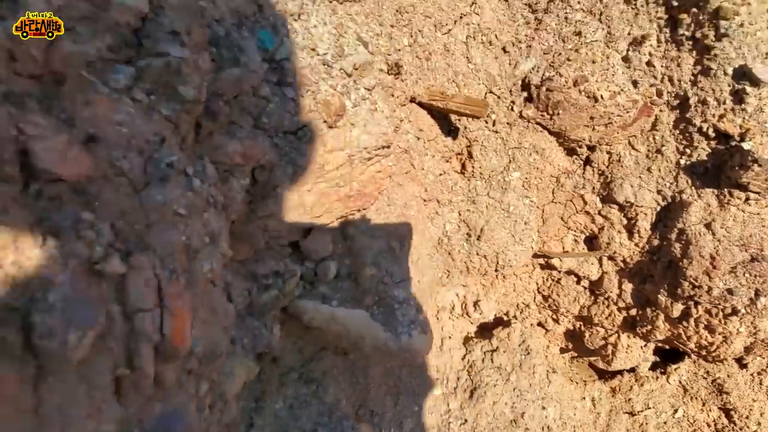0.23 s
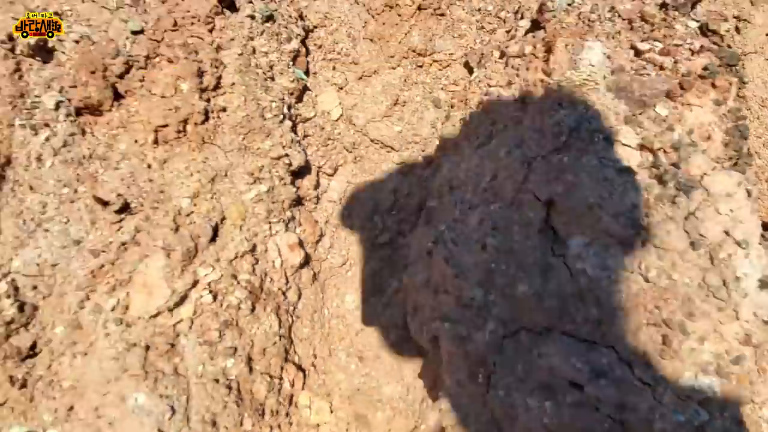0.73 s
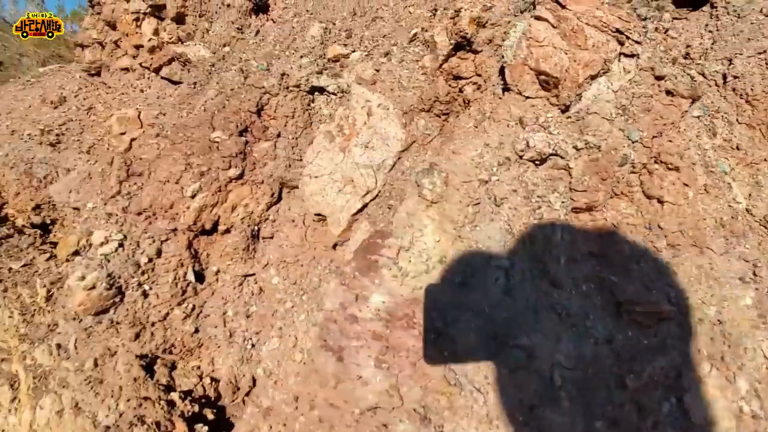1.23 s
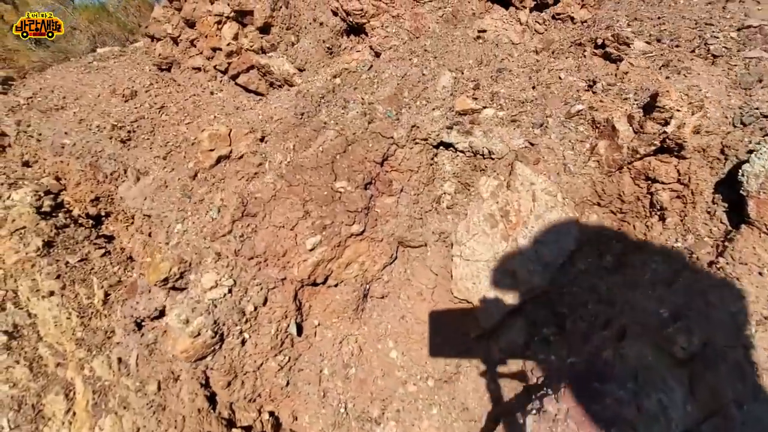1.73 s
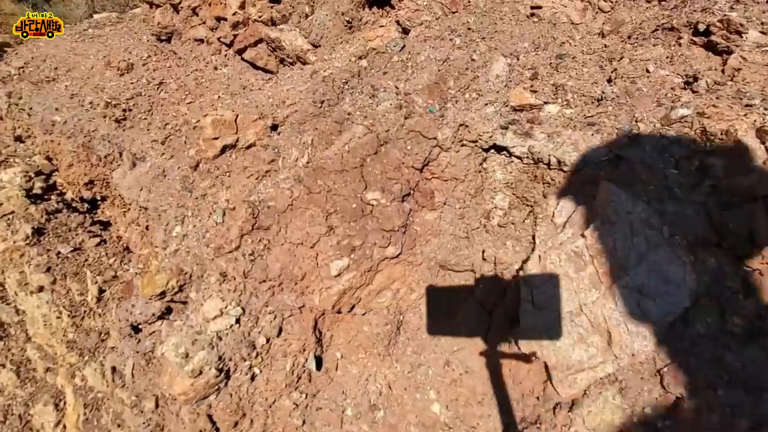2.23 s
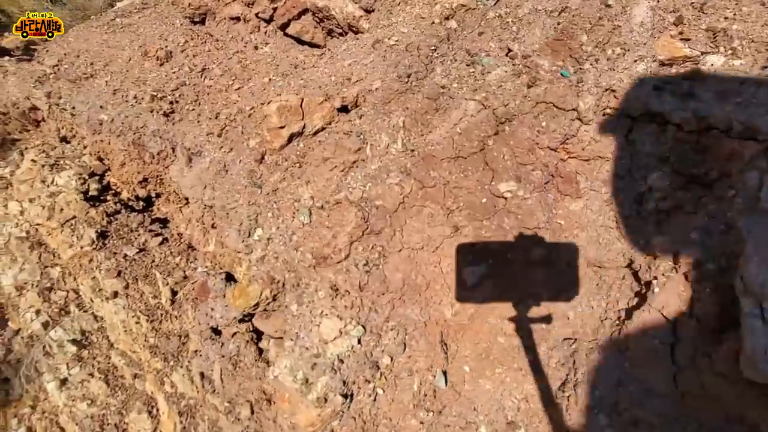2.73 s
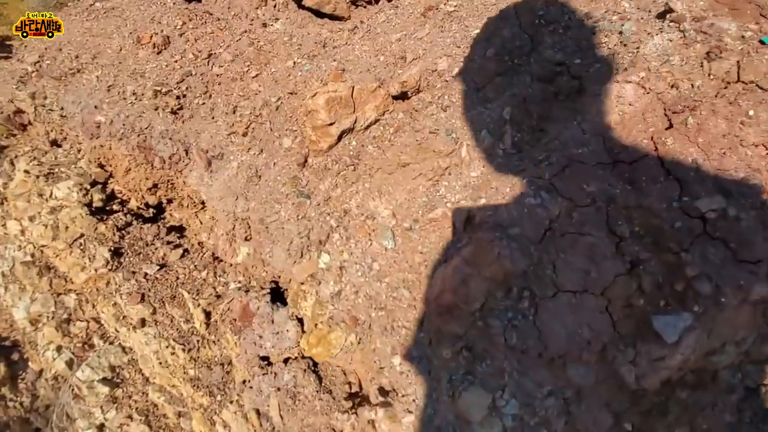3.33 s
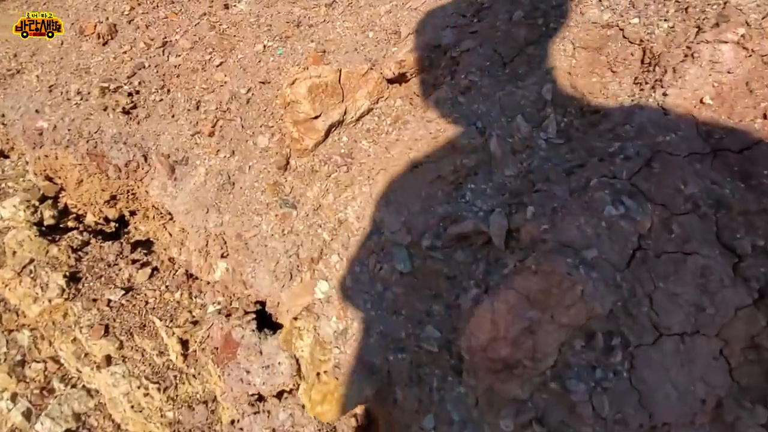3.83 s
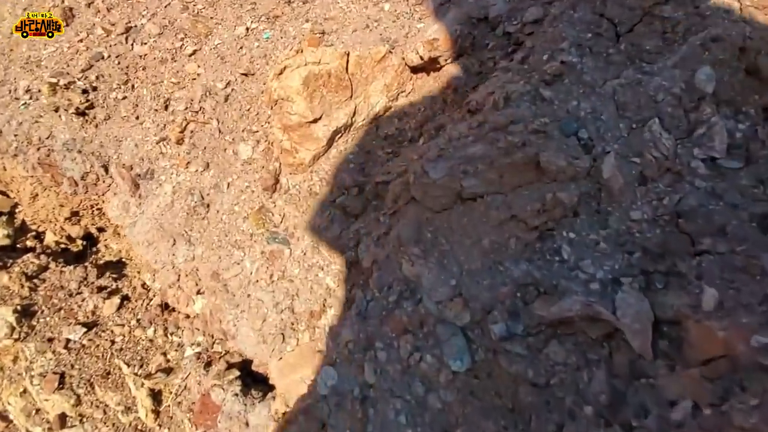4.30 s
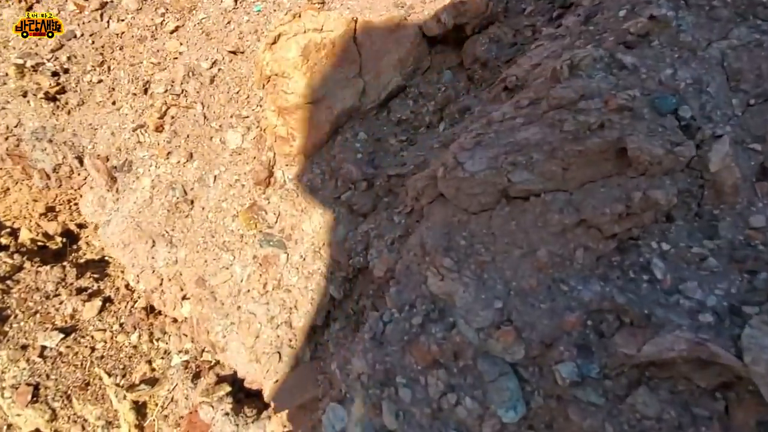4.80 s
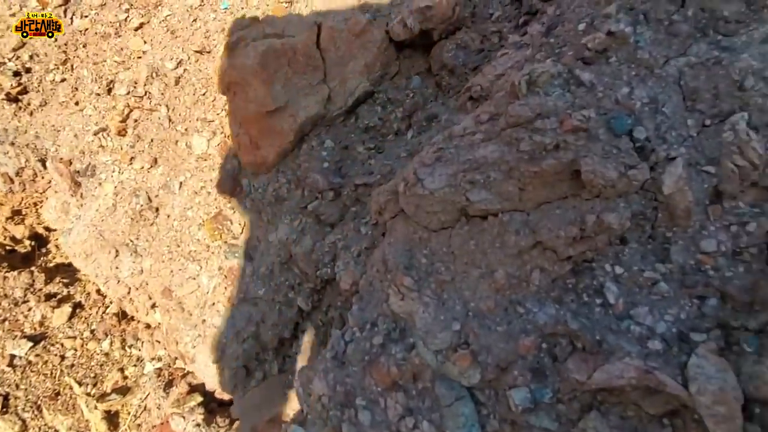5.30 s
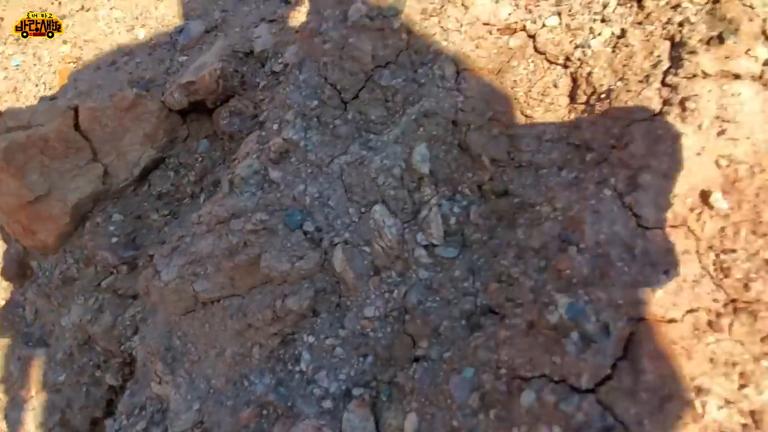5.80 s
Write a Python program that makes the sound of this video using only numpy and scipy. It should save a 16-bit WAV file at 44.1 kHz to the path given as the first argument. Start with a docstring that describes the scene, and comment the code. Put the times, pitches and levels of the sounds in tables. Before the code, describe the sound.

Slow, uneven footsteps cross dry, stony ground outdoors, heard close up while wind buffets the microphone. It opens quietly with a faint hiss and low rumble. At about 0.7 seconds a stone cracks and the wind picks up. From 1 to 2 seconds grit crackles brightly, sand hisses and a sole scuffs, with pebbles knocking underfoot. More crunches and clinks follow between 2.5 and 3 seconds. The wind rumbles, flutters and slaps unevenly on the left and right, strongest around 3.4 to 3.7 seconds. It drops away near 3.9 seconds, when a heel lands with a dull thud, followed by a scrape and a run of stony clacks, sharpest around 4.4 seconds. Gusts return from 4.5 seconds, with a soft scuffing step near 5 seconds, thumps of wind around 5.4 and another crunch at 5.7 seconds.

```python
"""Slow steps crunch and scuff over dry stony ground while wind buffets a phone held on a pole.
Under each sole pebbles knock, grit crackles and sand hisses; single stones crack and clink.
Rubber drags over packed earth, and one heel lands hard. The steps reach both microphone ports.
Wind rumbles, flutters and slaps at each port separately, over a faint hiss."""
import sys
import numpy as np
from scipy import signal
from scipy.fft import rfft, irfft, next_fast_len
from scipy.io import wavfile
from scipy.ndimage import uniform_filter1d, minimum_filter1d

SR = 44100
rng = np.random.default_rng(int(sys.argv[2]) if len(sys.argv) > 2 else 0)


def dump(signal):
    """Clip the signal to [-1, 1] and save it as 16-bit WAV at the path in sys.argv[1]."""
    limited = np.clip(np.atleast_2d(signal).T, -1, 1)
    pcm = np.round(limited * 32767).astype(np.int16)
    wavfile.write(sys.argv[1], SR, pcm)


N = 266849

# spectrum of sand and of crack ticks: (frequency [Hz], relative level [dB])
SAND_SPECTRUM = [(5500, -36), (8000, 7.5), (10000, 1), (13000, 1.5), (16000, -3), (20000, 9)]


def ground_crunch():
    """Pebbles knock, grit crackles, sand hisses; returns a common part and a scattered part per port."""
    # impact spectra: (frequency [Hz], relative level [dB])
    pebble_spectrum = [(250, -21), (480, -4.5), (700, -1.5), (950, -3.5), (1300, -8), (1800, -7),
                       (2600, -11), (4000, -24.5)]
    grit_spectrum = [(1200, -17), (2200, -1), (3200, 4), (3900, 5), (5000, -5.5), (6000, 0), (7500, -12),
                     (9500, -61.5)]
    # loose pebbles, then grit: (lowest [Hz], highest [Hz], taps per stone [1/s], t60 [s], share [dB])
    loose_stones = [(633, 2000, 70, 0.048, -1.5), (2480, 6100, 140, 0.0063, -2.5)]
    coarse = grains(rate_per_s=700, spread_db=3.3, decay_s=0.0025)
    fine = grains(rate_per_s=1100, spread_db=2.7, decay_s=0.0018)
    gains = tread_gains()
    layers = list(zip(gains, (coarse, fine, fine), (pebble_spectrum, grit_spectrum, SAND_SPECTRUM)))

    def crunch():
        return sum(gain * unit_rms(colour(impacts * rng.standard_normal(N), spectrum))
                   for gain, impacts, spectrum in layers)

    common, scattered = crunch(), [crunch(), crunch()]
    for side in scattered:
        side += sum(gain * ringing_stones(*row) for gain, row in zip(gains, loose_stones))
    return common, scattered


def tread_gains():
    """Gains of pebbles, grit and sand as each tread lands, holds and lifts off."""
    # (full weight at [s], landing [s], hold [s], pebbles [dB], grit [dB], sand [dB])
    treads = [(0, .05, 0.0076, -63.5, -87, -94), (.38, 0.3, 0.14, -76, -78, -73),
              (0.7, 0.033, 0.0078, -56, -61, -58), (.87, 0.27, 0.076, -61, -65.5, -54),
              (1.029, 0.079, 0.089, -53.5, -56.5, -53), (1.14, 0.17, 0.1, -51.5, -71, -59),
              (1.26, 0.12, 0.015, -72, -59.5, -50.5), (1.36, 0.12, 0.13, -58, -59.5, -57),
              (1.58, 0.37, 0.037, -54, -66.5, -66), (1.755, 0.13, 0.0055, -45, -49.5, -51),
              (1.989, 0.08, 0.036, -49.5, -57, -59), (2.198, 0.26, 0.12, -60.5, -72, -65),
              (2.528, 0.33, 0.0072, -55, -59.5, -63), (2.69, 0.059, 0.31, -63, -65.5, -67),
              (2.919, 0.06, 0.17, -51.5, -58, -61), (3.3, 0.69, 0.18, -65.5, -71.5, -85),
              (3.669, 0.1, 0.012, -52.5, -64.5, -78.5), (3.927, 0.035, 0.0073, -52, -62.5, -61),
              (3.995, .02, 0.018, -76, -66.5, -60), (4.064, .02, 0.0091, -56.5, -71, -55),
              (4.109, 0.056, 0.016, -51, -60, -75), (4.219, 0.11, 0.0077, -53.5, -60, -58),
              (4.36, 0.25, 0.11, -56.5, -68, -66.5), (4.55, 0.098, 0.094, -70, -75, -77),
              (4.9, 0.26, 0.069, -66, -64.5, -65), (5.03, 0.18, 0.032, -52.5, -59, -61),
              (5.38, 0.13, 0.25, -69, -78.5, -88), (5.735, 0.1, 0.054, -52, -62, -64.5),
              (6.04, 0.16, .02, -54, -70, -83)]
    landing_rise_db, lift_db_per_s = 32.5, 125
    t, power = np.arange(0, N / SR + .002, .001), 0
    for at_s, landing_s, hold_s, *levels_db in treads:
        landing_db = landing_rise_db * np.maximum(at_s - t, 0) / landing_s
        lift_db = lift_db_per_s * np.maximum(t - at_s - hold_s, 0)
        power = power + np.outer(undb(levels_db) ** 2, undb(-landing_db - lift_db) ** 2)
    return [np.interp(np.arange(N) / SR, t, np.sqrt(layer)) for layer in power]


def ringing_stones(low_hz, high_hz, taps_per_s, t60_s, share_db, count=6):
    """Loose stones of different sizes, tapped at random, each ring briefly at their own pitch."""
    out, pole = 0, 1000. ** (-1 / (t60_s * SR))
    for hz in low_hz * (high_hz / low_hz) ** ((np.arange(count) + rng.random(count)) / count):
        taps = np.zeros(N)
        position, draw = rng.random((2, int(taps_per_s * N / SR)))
        taps[(position * N).astype(int)] = -np.log(draw + .02)
        resonator = [1, -2 * pole * np.cos(2 * np.pi * hz / SR), pole ** 2]
        out = out + unit_rms(signal.lfilter([1, 0, -1], resonator, taps))
    return undb(share_db) * unit_rms(out)


def stone_cracks():
    """Each break is a burst of tiny impacts: a low knock, a clink and a high tick, in stereo."""
    # (time [s], knock [dB], knock [Hz], clink [dB], clink [Hz], tick [dB], crumbling [s])
    cracks = [(0.695, -29.5, 1920, -33.5, 5600, -36, 0.032),
              (0.827, -47.5, 950, -41.5, 5960, -30.5, 0.0083), (0.8845, -65, 1000, -48, 4600, -46, 0.0087),
              (0.905, -50, 710, -40, 6300, -58, 0.005), (1.024, -54, 802, -32, 4800, -31, 0.0072),
              (1.039, -71, 888, -27, 4280, -47, 0.01), (1.095, -38.5, 910, -40, 3850, -57, 0.0037),
              (1.19, -36, 1380, -43, 6200, -60, .015), (1.165, -37, 900, -48, 6330, -57.5, 0.024),
              (1.288, -54, 802, -55, 3570, -29.5, 0.014), (1.313, -63, 1240, -43, 4440, -36, 0.011),
              (1.33, -55, 1500, -36, 4500, -42, 0.0071), (1.337, -41, 910, -35.5, 3650, -22.5, 0.017),
              (1.347, -47, 1490, -39, 3580, -29, .008), (1.371, -42, 1050, -34.5, 4350, -28, 0.047),
              (1.3985, -59, 1210, -40.5, 4500, -29, .007), (1.403, -41.5, 960, -40, 4340, -33, 0.0086),
              (1.408, -44, 1300, -49, 4000, -30, 0.0066), (1.414, -51, 1200, -40, 4300, -30, .01),
              (1.497, -33.5, 930, -69, 3290, -64.5, 0.057), (1.764, -35.5, 1060, -33, 3940, -24, 0.044),
              (1.95, -34, 1010, -35.5, 3660, -61, 0.022), (1.981, -34.5, 830, -35.5, 3900, -37.5, 0.073),
              (2.012, -26, 940, -34, 7300, -64, 0.021), (2.067, -38, 1050, -64, 3560, -63, 0.016),
              (2.251, -43.5, 1290, -50, 4500, -70, 0.017), (2.546, -41.5, 1750, -39.5, 3600, -68, 0.041),
              (2.556, -36.5, 1620, -40, 3860, -68, 0.02), (2.681, -26, 1430, -33, 2780, -54, 0.0077),
              (2.715, -36.5, 1500, -62, 3470, -74, 0.0034), (2.737, -49, 1010, -47, 2980, -70, .008),
              (2.789, -41, 1050, -39.5, 5600, -66, 0.0083), (2.91, -30.5, 960, -36.5, 4700, -33.5, 0.0054),
              (3.009, -57, 840, -65, 6430, -32.5, 0.029), (3.024, -23, 1700, -27.5, 3700, -61, 0.02),
              (3.074, -50, 1290, -35, 3200, -34, 0.0083), (3.642, -66, 1220, -49.5, 5200, -70, 0.0087),
              (3.682, -44, 1000, -37, 4600, -61, 0.015), (3.7533, -41.5, 2190, -56, 2970, -72, 0.018),
              (3.933, -33, 1380, -34, 5140, -60, 0.02), (3.99, -40, 1310, -43.5, 3380, -40, 0.016),
              (4.004, -46.5, 900, -50, 5000, -59, .012), (4.034, -43, 1500, -50, 5500, -58, .008),
              (4.058, -35.5, 810, -37.5, 4150, -62, 0.019), (4.081, -40, 1500, -43.5, 5900, -65, 0.016),
              (4.096, -39.5, 826, -44, 5570, -60, 0.012), (4.12, -32, 768, -38, 3250, -59, 0.02),
              (4.127, -31.5, 800, -45, 4450, -60, .012), (4.245, -38, 920, -44, 3800, -64, 0.014),
              (4.262, -43, 850, -58, 4000, -66, 0.0099), (4.217, -36.5, 1120, -49.5, 6470, -64, 0.032),
              (4.3453, -19.5, 920, -31, 5280, -49, 0.016), (4.4, -30.5, 900, -45, 4200, -62, 0.0089),
              (4.428, -24.5, 920, -45.5, 5330, -59, 0.011), (4.463, -40, 850, -44, 3580, -58, 0.023),
              (5.014, -51.5, 867, -40.5, 4170, -73, 0.024), (5.725, -28.5, 1750, -30, 3190, -56, 0.024),
              (5.7547, -40.5, 800, -37.5, 5600, -31.5, 0.0087)]
    # stone resonances: (multiple of knock or clink pitch, relative level [dB])
    knock_shape = [(.3, -34.5), (.55, -15), (.78, 0.5), (1.04, -1.5), (1.36, 0), (1.65, -6), (2.0, -13.5),
                   (2.6, -15.5), (3.3, -32.5), (8, -68)]
    clink_shape = [(.25, -29), (.55, -8), (0.92, -3.5), (1.001, 3), (1.08, -7), (1.6, -12), (2.3, -25.5)]
    length = 4096
    out, t = np.zeros((2, N + length)), np.arange(length) / SR
    bursts = rng.standard_normal((len(cracks), 2, length))
    bursts[:, :, 48] += 9.0  # one firm leading blow
    lags = rng.integers(-3, 4, len(cracks))  # samples, from each stone's bearing
    crumbs = .09 * np.minimum(t / .004, 1) * 1000. ** (-t / .07)  # trickle after the break
    for crack, (burst, other), lag in zip(cracks, bursts, lags):
        at_s, knock_db, knock_hz, clink_db, clink_hz, tick_db, crumble_s = crack
        fade = np.minimum(t / 0.0017, 1) * 1000. ** (-t / np.clip(crumble_s, .004, .09))
        knock = [(knock_hz * ratio, db) for ratio, db in knock_shape]
        clink = [(clink_hz * ratio, db) for ratio, db in clink_shape]
        start = int(at_s * SR)
        # short waves bend round the phone unevenly: less coherence in the treble
        parts = (knock_db, knock, .95, 1), (clink_db, clink, .7, 1.3), (tick_db, SAND_SPECTRUM, .55, 1.6)
        for db, spectrum, coherence, steepness in parts:
            far = coherence * np.roll(burst, lag) + np.sqrt(1 - coherence ** 2) * other
            envelope = fade ** steepness + crumbs / steepness
            pair = np.array([colour(side * envelope, spectrum) for side in (burst, far)])
            out[:, start:start + length] += undb(db) * pair / np.abs(pair).max(axis=1, keepdims=True)
    return out[:, :N]


def sole_scuffs():
    """Rubber drags over packed earth in uneven slips and hums in the hollow under the arch."""
    # (start [s], end [s], level [dB], hollow resonance [Hz])
    scuffs = [(.31, .59, -75.5, 6040), (.83, 1.003, -64, 5730), (1.12, 1.285, -55, 764),
              (2.463, 2.59, -54.5, 1680), (3.988, 4.29, -63, 1450), (4.86, 5.134, -58.5, 773)]
    t, out = np.arange(N) / SR, np.zeros(N)
    slips = grains(rate_per_s=260, spread_db=5.5, decay_s=0.017)
    for start_s, end_s, db, hz in scuffs:
        span = slice(int(start_s * SR), int(end_s * SR))
        contact = np.clip(np.minimum((t[span] - start_s) / 0.046, (end_s - t[span]) / 0.045), 0, 1)
        hollow = [(hz / 3, -40), (hz / 1.5, -10), (hz, 0), (hz * 1.3, -9), (hz * 1.9, -17),
                  (hz * 2.5, -11), (hz * 3.2, -26), (hz * 6, -60)]
        friction = slips * rng.standard_normal(N)
        out[span] += undb(db) * contact * unit_rms(colour(friction[span], hollow))
    return out


def heel_thud():
    """One heel lands hard: a short, dull noise burst."""
    at_s, level_db, hz, t60_s = 3.921, -35, 260, .05
    t = np.arange(N) / SR
    decay = (t > at_s) * 1000. ** (-np.maximum(t - at_s, 0) / t60_s)
    thud = colour(rng.standard_normal(N) * decay, [(hz / 3, -25), (hz, 0), (hz * 3, -8), (hz * 20, -55)])
    return undb(level_db) * thud / np.abs(thud).max()


def wind_buffeting(port):
    """Eddies roll over one port and flutter on their crests."""
    # (frequency [Hz], relative level [dB])
    eddy_spectrum = [(15, -38), (30, -12.5), (50, 3), (70, 4), (98, -1), (130, -15), (250, -39),
                     (400, -87.5)]
    flutter_spectrum = [(60, -18), (120, 1.5), (170, 0.5), (250, -10), (350, -19), (500, -32), (800, -51),
                        (1500, -84)]
    eddy_gain, flutter_gain = wind_gains(port)
    eddies = steady(colour(rng.standard_normal(N), eddy_spectrum), span_s=0.089)
    crests = np.exp(1.28 * eddies)
    flutter = steady(colour(crests * rng.standard_normal(N), flutter_spectrum), span_s=0.056)
    return eddy_gain * eddies + flutter_gain * flutter


def wind_gains(port):
    """Eddy and flutter gains at one port: breeze and gusts add in power."""
    # (time [s], left [dB], right [dB])
    breeze = [(0, -61, -40), (.3, -46, -42.5), (.56, -37.5, -43), (.66, -43, -19.5), (1.0, -39, -24),
              (1.1, -19.5, -25.5), (1.45, -24.5, -28), (1.9, -24.5, -21.5), (2.3, -21, -21.5),
              (2.62, -32.5, -35), (3.15, -30.5, -19.5), (3.55, -21.5, -11), (3.72, -16, -24),
              (3.9, -45, -40), (4.35, -54, -36.5), (4.5, -36, -28), (4.8, -30, -23), (4.95, -37, -27.5),
              (5.3, -26, -22.5), (5.6, -29.5, -22), (5.85, -22.5, -21.5), (5.97, -54, -30.5),
              (6.05, -21.5, -42)]
    # left list, right list: (time [s], level [dB], width [s], flutter re eddies [dB])
    gusts = ([(.83, -26.5, 0.12, -22), (1.08, -16.5, 0.023, -19), (1.41, -22, 0.065, -28),
             (1.58, -17, 0.028, -13.5), (1.72, -10.5, 0.052, -15), (1.985, -15, 0.027, -6),
             (2.13, -10.5, 0.016, -31.5), (2.45, -29.5, 0.023, -17), (2.58, -17.5, 0.012, -22),
             (2.82, -17.5, 0.018, -25), (2.93, -19, 0.016, -6.5), (3.08, -14, 0.02, -26),
             (3.38, -15.5, 0.07, -21), (3.66, -10, 0.04, -18), (3.84, -16.5, 0.013, -18),
             (4.41, -31, 0.028, -14), (5.06, -28.5, 0.045, -16), (5.47, -7.5, 0.019, -21.5)],
             [(.2, -33, 0.039, -28), (.38, -32.5, 0.062, -25), (.645, -21, 0.039, -39),
             (.865, -18.5, 0.014, -27), (1.05, -20, 0.04, -14.5), (1.29, -19.5, 0.0098, -33),
             (1.56, -10, 0.059, -19), (1.78, -15.5, 0.014, -20), (2.07, -12, 0.02, -39),
             (2.66, -22.5, 0.011, -13), (2.8, -21.5, 0.05, -13.5), (3.028, -8.5, 0.012, -12.5),
             (3.21, -21, 0.036, -7), (3.39, -9, 0.017, -11.5), (3.49, -7, 0.049, -8.5),
             (3.92, -27, 0.022, -16.5), (4.16, -31.5, 0.058, -16.5), (4.315, -22.5, 0.0077, -28),
             (4.41, -22, 0.016, -15), (4.48, -15.5, 0.013, -17), (4.55, -23.5, 0.07, -31),
             (4.712, -8.5, 0.019, -27.5), (5.16, -13, 0.028, -18.5), (5.43, -15, 0.039, -14.5),
             (5.65, -15, 0.042, -27)])
    t = np.arange(N) / SR
    coarse_t = t[::32]
    times_s, *levels_db = np.transpose(breeze)
    breeze_db = np.interp(coarse_t, times_s, levels_db[port])
    eddy_power = undb(breeze_db) ** 2
    flutter_power = eddy_power * undb(-21 + 0.54 * (breeze_db + 27)) ** 2  # stronger breeze flutters more
    for at_s, db, width_s, flutter_db in gusts[port]:
        swell = undb(db) ** 2 * np.exp(-((coarse_t - at_s) / width_s) ** 2)
        eddy_power += swell
        flutter_power += swell * undb(flutter_db) ** 2
    return [np.interp(t, coarse_t, np.sqrt(power)) for power in (eddy_power, flutter_power)]


def wind_puffs(port):
    """Single puffs slap the membrane; its vent lets slow pressure out, so each slap swings back."""
    # left list, right list: (time [s], peak before the vent [dB], width [s])
    puffs = ([(.88, -18.5, 0.0021), (.955, -25, 0.00055), (1.137, -16, 0.0016), (1.214, -13.5, 0.0012),
             (1.399, -12.5, 0.0016), (1.58, -7, 0.0016), (1.985, -10.5, 0.00087), (2.21, -14, 0.001),
             (2.25, -14.5, 0.0011), (2.317, -14, 0.001), (3.49, -15, 0.0014), (3.651, -10, 0.0014),
             (5.481, -8.5, 0.0015)], [(.659, -21, 0.0012), (.872, -16.5, 0.00096), (.96, -21.5, 0.0011),
             (1.19, -19, 0.0011), (1.553, -8.5, 0.001), (1.77, -16.5, 0.0011), (1.939, -11, 0.0014),
             (3.011, -15, 0.0011), (3.034, -8, 0.00054), (3.123, -13, 0.001), (3.399, -2.5, 0.00056),
             (3.451, -7.5, 0.0048), (3.494, -3, 0.00079), (3.506, -1, 0.00076), (3.526, -4, 0.0021),
             (4.696, -10, 0.0011), (5.16, -13.5, 0.00098), (5.176, -12.5, 0.0013), (5.43, -5, 0.0015)])
    # (frequency [Hz], gain [dB])
    vent_response = [(12, -24), (50, -19), (110, 9.5), (480, 1.5), (750, -12.5), (1500, -48)]
    t, slaps = np.arange(N) / SR, np.zeros(N)
    signs = rng.choice([-1., 1.], len(puffs[port]))
    for (at_s, db, width_s), sign in zip(puffs[port], signs):
        span = slice(int((at_s - 8 * width_s) * SR), int((at_s + 8 * width_s) * SR))
        slaps[span] += sign * undb(db) * np.exp(-((t[span] - at_s) / width_s) ** 2 / 2)
    return colour(slaps, vent_response)


def hiss(rms_db=-63.5):
    """Faint steady noise at one port."""
    # (frequency [Hz], relative level [dB])
    spectrum = [(260, 3.5), (450, -7), (523, -8), (1180, -9.5), (1310, -11.5), (6000, -16),
                (7640, -21.5), (15000, -18), (16500, -30)]
    return undb(rms_db) * unit_rms(colour(rng.standard_normal(N), spectrum))


def grains(rate_per_s, spread_db, decay_s):
    """Envelope of random impacts, few large and many small, each crumbling away."""
    hits = rng.random(N) < rate_per_s / SR
    power = hits * undb(2 * spread_db * np.minimum(rng.exponential(size=N), 4.5))
    return np.sqrt(signal.lfilter([1], [1, -np.exp(-1 / (decay_s * SR))], power))


def colour(x, points, lag_s=0.):
    """Minimum-phase filter through (frequency [Hz], gain [dB]) points, plus a delay."""
    size = next_fast_len(len(x) + min(len(x), SR // 2))
    size += size % 2
    hz = np.arange(size // 2 + 1) * SR / size
    points_hz, points_db = np.transpose(points)
    log_gain = np.interp(np.log(hz + 1), np.log(points_hz), points_db) * np.log(10) / 20
    cepstrum = irfft(log_gain, size)
    cepstrum[1:size // 2] *= 2  # fold onto positive time
    cepstrum[size // 2 + 1:] = 0
    response = np.exp(rfft(cepstrum) - 2j * np.pi * hz * lag_s)
    return irfft(rfft(x, size) * response, size)[:len(x)]


def steady(x, span_s):
    """Divides out swells slower than span_s."""
    span = int(span_s * SR)
    power = uniform_filter1d(uniform_filter1d(x ** 2, span), span)
    return x / np.sqrt(power + 1e-9)


def undb(db):
    """Decibels to gain."""
    return 10 ** (np.asarray(db) / 20)


def unit_rms(x):
    """Scales to rms 1."""
    return x / np.sqrt(np.mean(x ** 2))


def scene():
    """Ground sounds reach both ports, the right one delayed; each port has its own wind and hiss."""
    # (frequency [Hz], left gain [dB], right gain [dB])
    port_responses = [(275.4, 16, 12), (770, 4, 1.5), (1840, 1, -3.5), (4070, 6, 0), (6760, 12, -1.5),
                      (7660, -11, -4), (9240, 2, 0.5), (14930, 4, -4.5)]
    right_lag_s = 7.5e-5
    hz, *gains_db = np.transpose(port_responses)
    common, scattered = ground_crunch()
    accents = stone_cracks() + sole_scuffs() + heel_thud()
    out = []
    for port in range(2):
        steps = 0.46 * common + 0.6 * scattered[port] + accents[port]
        steps = colour(steps, list(zip(hz, gains_db[port])), port * right_lag_s)
        out.append(steps + hiss() + wind_buffeting(port) + wind_puffs(port))
    return np.array(out)


def record(dry):
    """A limiter turns the loudest gusts down smoothly; the phone cuts the top."""
    span, cutoff_hz = int(.012 * SR), 16300
    gain = minimum_filter1d(np.minimum(1, 1 / (np.abs(dry) + 1e-9)), 2 * span)
    gain = uniform_filter1d(uniform_filter1d(gain, span), span)
    lowpass = signal.ellip(10, .2, 70, cutoff_hz, fs=SR, output="sos")
    return signal.sosfilt(lowpass, gain * dry)


dry = scene()
out = record(dry)
dump(out)
```